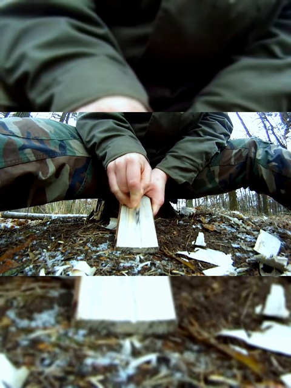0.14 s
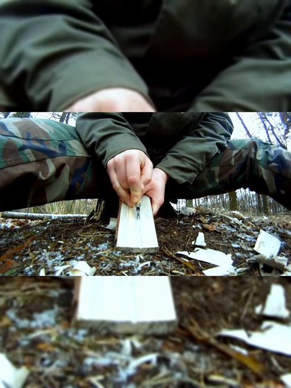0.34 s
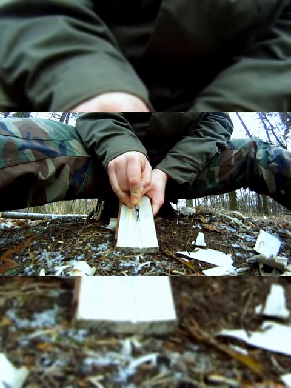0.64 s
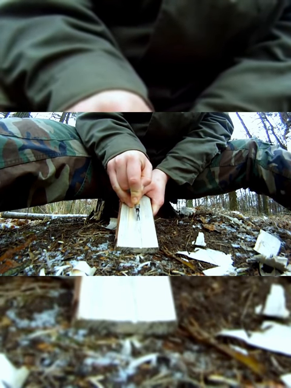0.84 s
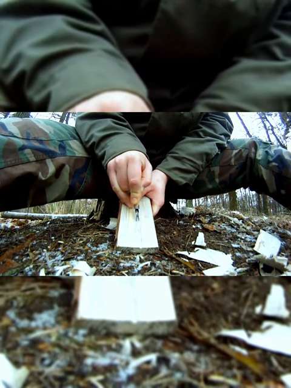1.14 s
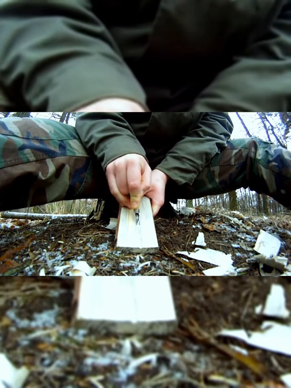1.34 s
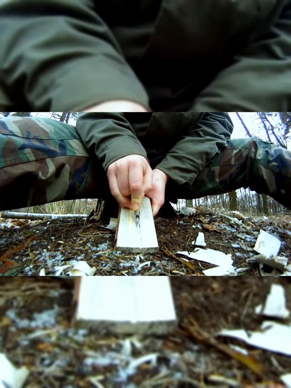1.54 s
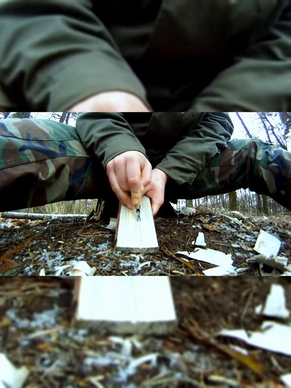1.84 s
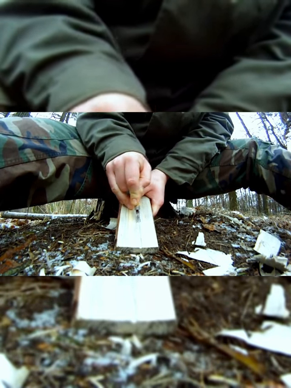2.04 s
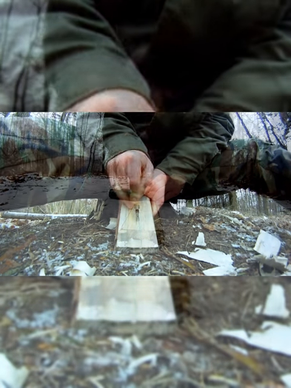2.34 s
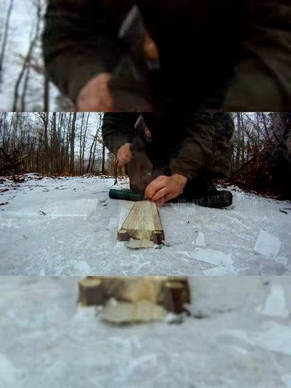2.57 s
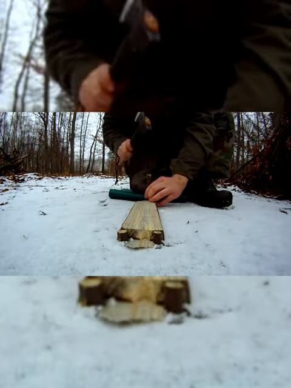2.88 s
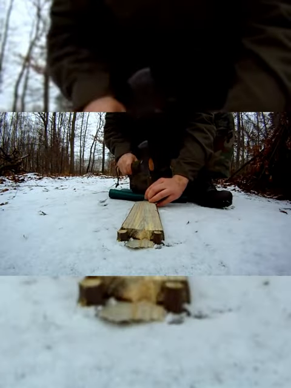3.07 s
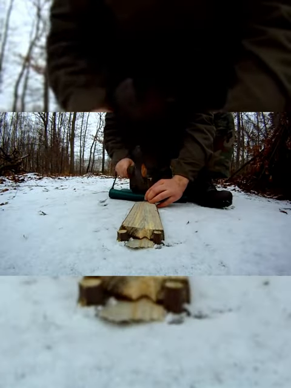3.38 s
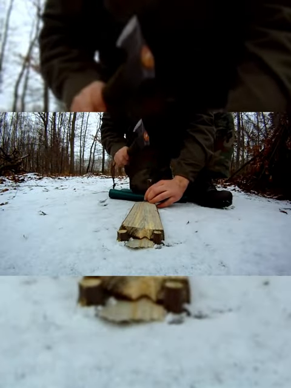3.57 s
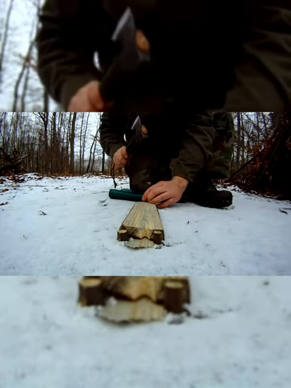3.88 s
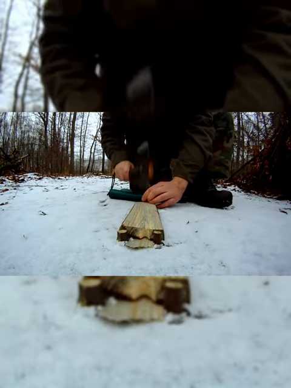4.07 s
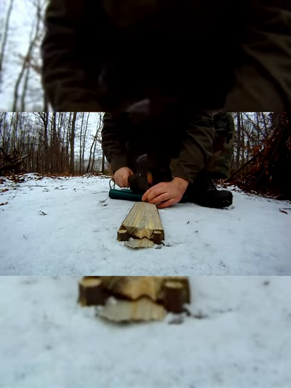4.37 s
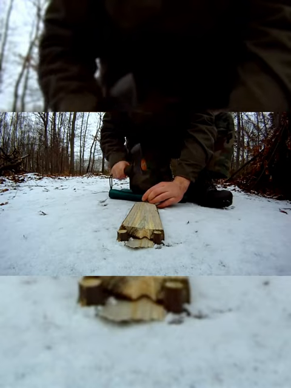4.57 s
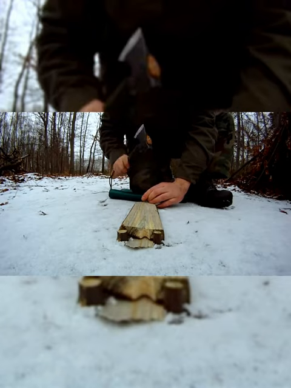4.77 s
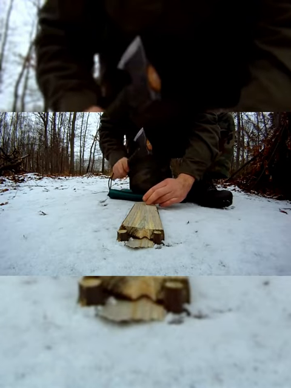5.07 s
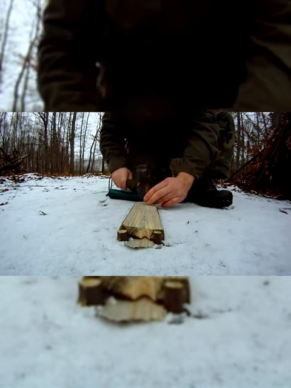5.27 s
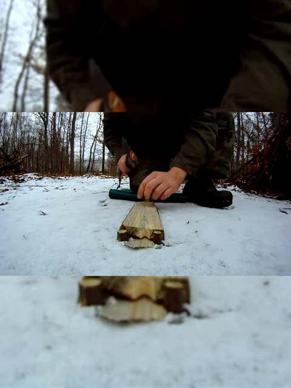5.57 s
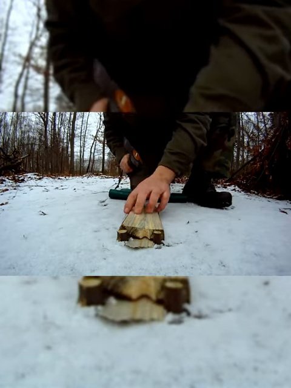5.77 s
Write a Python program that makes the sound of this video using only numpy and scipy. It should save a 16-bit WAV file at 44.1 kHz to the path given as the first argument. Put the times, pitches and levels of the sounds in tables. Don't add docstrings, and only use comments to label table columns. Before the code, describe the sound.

A knife point softly scratches and knocks on wood outdoors, then sped-up hatchet hits pound fast, cracking and thudding with distortion.

```python
import sys
import numpy as np
from scipy import signal
from scipy.fft import rfft, irfft, next_fast_len
from scipy.io import wavfile
from scipy.ndimage import uniform_filter1d, map_coordinates

SR = 44100
rng = np.random.default_rng(int(sys.argv[2]) if len(sys.argv) > 2 else 0)


def wav_record(signal):
    frames = np.transpose(np.atleast_2d(signal))
    bounded = np.clip(frames, -1, 1)
    quanta = np.round(bounded * 32767).astype(np.int16)
    wavfile.write(sys.argv[1], SR, quanta)


def magnitude_from_level(level_db):
    exponent = np.asarray(level_db, float) / 20
    return 10 ** exponent


N = 261051
SPAN = 2048
NEXT_PEG = 4.08

# t/s, thud peak level/dB, crack level/dB, lead-in swing level/dB
BLOWS = [(2.4407, -6, -22, -20), (2.57, -41, -64.5, -48), (2.7246, -4.5, -8.5, -19.5), (2.861, -3, -8, -21),
         (3.0033, -3, -9.5, -20), (3.1475, -5, -13.5, -13.5), (3.2873, -4, -9, -22.5),
         (3.4317, -6, -12, -17), (3.582, -6.5, -12, -26.5), (3.7213, -7, -14, -11.5),
         (3.8521, -25.5, -56, -21), (3.996, -6.5, -21.5, -44), (4.1558, -4.5, -12, -22),
         (4.3028, -4.5, -14, -13.5), (4.446, -3.5, -17, -16.5), (4.5986, -4, -17.5, -25),
         (4.7458, -11, -22, -12.5), (4.89, -7.5, -15, -24.5), (5.0314, -55, -64.5, -17),
         (5.1842, -4.5, -13, -28), (5.3276, -5, -17, -17), (5.4607, -4, -21, -21)]
# centre t/s, bass level/dB, wood level/dB, tint f/Hz, tint level/dB
BLUR_COPIES = [(2.436, -74, -33, 1400, 9.5), (2.5726, -25.5, -35.5, 870, 0.5), (2.718, -58.5, -34, 2260, 1),
               (2.8565, -51.5, -36, 1200, -13), (3.0022, -41.5, -33, 2590, 5),
               (3.1417, -53, -34.5, 3860, 9), (3.2844, -48.5, -32, 1090, -10),
               (3.4254, -52, -31.5, 1070, -11), (3.576, -36.5, -32, 1047, -11.5),
               (3.7148, -38.5, -33.5, 800, -11.5), (3.861, -30, -29.5, 3100, 7.5),
               (4.0055, -31, -30, 3250, 11.5), (4.1505, -61, -36, 4390, 7), (4.297, -56, -38, 3340, -5),
               (4.4419, -39, -38.5, 4270, 0), (4.595, -48, -39.5, 1170, 0.5),
               (4.74, -42, -38.5, 4900, 16.5), (4.889, -57, -39, 670, -9.5), (5.0335, -30, -38, 798, -13),
               (5.1851, -44, -41.5, 3900, -5), (5.323, -51, -43, 3500, -13.5),
               (5.4581, -58, -44, 1607, -23.5)]
# f/Hz, level/dB per Hz
GROUND = [(18, -18.5), (30, -22), (103, 5.5), (163, -1), (495, -4.5), (613, -17), (815, -17.5),
          (900, -21.5), (1170, -65), (1980, -120)]


def unit(x):
    return x / np.sqrt(np.mean(x ** 2) + 1e-20)


def bumps(hz, shapes):
    return sum(db * np.exp(-((hz - centre) / width) ** 2) for centre, width, db in shapes)


def noise(spectrum, length, ripple_db=0., ripple_hz=300., channels=1, bells=()):
    m = next_fast_len(length + 2048)
    hz = np.fft.rfftfreq(m, 1 / SR)
    f, level_db = np.transpose(spectrum)
    ripple = map_coordinates(rng.standard_normal(1000), [hz / ripple_hz], order=3)
    colour_db = np.interp(np.log(hz + 1), np.log(f + 1), level_db)
    colour = magnitude_from_level(colour_db + ripple_db * ripple + bumps(hz, bells))
    white = rfft(rng.standard_normal((channels, m)))
    return unit(irfft(white * colour, m)[:, :length])


def add(track, s, sound):
    start = round(s * SR)
    track[..., start:start + sound.shape[-1]] += sound


def apart(mid, side):
    return np.array([mid + side, mid - side])


def forest():
    # t/s, level/dB
    stir = [(0, -60), (1.3, -60), (1.55, -59.5), (2.189, -59.5), (2.41, -55), (2.9, -62), (3.5, -58),
            (4.06, -58), (4.45, -60.5), (4.85, -58.5), (5.92, -58.5)]
    # f/Hz, level/dB per Hz
    rumble_colour = [(15, -35), (25, -9.5), (140, 1), (372, -8), (533, -5.5), (708, -16), (900, -34),
                     (1170, -49), (1980, -120)]
    hiss_colour = [(410, -18.5), (700, -2), (950, -5.5), (1440, -5), (3740, -10), (4990, -14), (6070, -19),
                   (7100, -17), (9000, -16.5), (12000, -20.5), (14800, -21), (15450, -25.5), (15560, -65)]
    t = np.arange(N) / SR
    stir_db = np.interp(t, *np.transpose(stir))
    rows = np.array([0 * t, 0 * t + 1])
    drift = map_coordinates(rng.standard_normal((2, 200)), [rows, np.array([14 * t, 9 * t])], order=1)
    rumble = magnitude_from_level(stir_db + 2.4 * drift[0]) * noise(rumble_colour, N)[0]
    hiss_gain = magnitude_from_level(stir_db - 10 + 0.4 * drift[1])
    hiss, other = hiss_gain * noise(hiss_colour, N, channels=2)
    return apart(rumble + hiss, magnitude_from_level(-2.5) * other)


def echoes():
    # f/Hz, level/dB per Hz
    tree_colour = [(410, -38.5), (700, -6), (1250, -26.5), (1380, -17.5), (1600, -12.5), (2800, -3.5),
                   (3410, -10), (4610, -15), (5920, -30.5), (9110, -13), (10900, -36.5), (15200, -18),
                   (16000, -36.5)]
    # t/s, level/dB
    tree_line = [(2.43, -74), (2.86, -58.5), (3.1, -56.5), (3.9, -59.5), (4.15, -66), (5.46, -67.5)]
    # level/dB, T60/s
    near_ground = [(-44.5, 0.024), (-45, 0.11)]
    # delay t/s, width t/s, level/dB over the hump
    trunk = (0.071, 0.0024, 0)
    track = np.zeros((2, N + SR))
    t = np.arange(6000) / SR
    slap_s, slap_width, slap_db = trunk
    slap = magnitude_from_level(slap_db) * np.exp(-((t - slap_s) / slap_width) ** 2)
    late = np.maximum(t - 0.032, 0) / 0.021
    hump = late ** 0.82 * np.exp(0.67 * (1 - late))
    for s, thud_db, *_ in BLOWS:
        echo_db = np.interp(s, *np.transpose(tree_line))
        near_db, t60 = near_ground[int(s > NEXT_PEG)]
        near_gain = magnitude_from_level(max(thud_db, -12) + near_db - 60 * t / t60)
        near = near_gain * noise(tree_colour, len(t), ripple_db=2, channels=2)
        boom = magnitude_from_level(thud_db - 12.5 - 60 * t / 0.026) * noise(GROUND, len(t))[0]
        far = magnitude_from_level(echo_db - 5) * (hump + slap) * noise(tree_colour, len(t), channels=2)
        add(track, s, apart(near[0] + far[0] + boom, magnitude_from_level(-9.5) * near[1] + magnitude_from_level(-31.5) * far[1]))
    return track[:, :N]


def touches():
    # centre t/s, length t/ms, knock level/dB, scratch level/dB, grit f/Hz
    knife = [(0.053, 32, -61, -72, 1600), (0.2, 19.3, -60, -69.5, 1600), (0.243, 13.3, -52, -60, 1570),
             (0.282, 38.5, -45, -59, 1700), (.395, 28, -52, -67, 3700), (0.454, 25, -58, -77, 1600),
             (.49, 180, -67, -74, 3700), (.521, 220, -82, -87, 8300), (.712, 35, -55, -64, 1600),
             (0.807, 45.4, -47.5, -56.5, 1540), (.902, 13, -49.5, -65, 1980), (1.013, 27, -60, -69.5, 1600),
             (1.349, 38, -56.5, -68.5, 1600), (1.402, 37, -49.5, -57.5, 1610),
             (1.639, 32, -51.5, -63.5, 1960), (1.673, 3.9, -42, -44.5, 1800),
             (1.696, 57.5, -47, -58.5, 1740), (1.892, 4.6, -46, -57, 2970), (2.179, 4.5, -48, -52, 4800),
             (2.19, 5.5, -43.5, -49.5, 7360), (2.18, 21, -80, -59.5, 4970), (2.225, 7.1, -45, -53.5, 4500),
             (2.255, 43, -53, -71, 3000)]
    # centre t/s, length t/ms, knock
    # level/dB, scratch level/dB, grit f/Hz
    later_ticks = [(2.36, 56, -49, -69, 3660), (2.501, 35, -64, -61.5, 1620), (4.018, 10, -26, -36, 1990),
                   (5.003, 13, -50, -66, 1500), (4.215, 8.8, -57, -66, 2000), (4.358, 9, -61, -63, 2010),
                   (5.255, 7.3, -61, -60, 7900), (5.512, 27.4, -52, -84, 3000), (5.596, 18, -65, -64.5, 1980),
                   (5.768, 27.6, -39, -63.5, 1650), (5.804, 22, -48, -63, 2260)]
    # length t/ms, knock f/Hz
    knock_pitch = [(9, 452), (14, 167), (45, 132.4)]
    # f/Hz, level/dB per Hz
    scratch_colour = [(410, -25.5), (700, -3.5), (1230, -13), (1520, -3.5), (2400, -12.5), (2960, -6),
                      (4210, -25), (4800, -7.5), (5990, -32.5), (7110, -15), (7790, -19), (14600, -23),
                      (16000, -26.5)]
    track = np.zeros((2, N + SR))
    for s, ms, knock_db, scratch_db, grit_hz in knife + later_ticks:
        length = round(1.6 * ms * SR / 1000)
        grit = magnitude_from_level(17 * uniform_filter1d(rng.standard_normal(16000), 40))[:length]
        grit_width = np.interp(ms, [60, 200], [0.15, 0.03]) * grit_hz
        grit_db = np.interp(ms, [60, 200], [8, 22])
        rasp = noise(scratch_colour, 16000, ripple_db=0.5, ripple_hz=494, channels=2,
                     bells=[(grit_hz, grit_width, grit_db)])
        scratch, other = magnitude_from_level(scratch_db + 2.5) * unit(grit * rasp[:, :length])
        knock_hz = np.interp(ms, *np.transpose(knock_pitch))
        thump = noise(GROUND, 16000, bells=[(knock_hz, 0.12 * knock_hz, 16)])[0, :length]
        knock = magnitude_from_level(knock_db) * unit(thump)
        sound = np.hanning(length) * apart(knock + scratch, magnitude_from_level(-36) * other)
        add(track, s - length / SR / 2, sound)
    return track[:, :N]


def blurs():
    # f/Hz, level/dB per Hz
    wood_colour = [
        [(290, -40.5), (500, -19.5), (923, -4.5), (1410, 7.5), (1740, -0.5), (2120, 3), (2750, -4),
         (3350, -11.5), (4390, -6.5), (4820, -15), (6000, -21.5), (7800, -59), (13200, -120)],
        [(290, -71), (500, -4.5), (973, -5.5), (1360, 1), (1890, -6), (2210, 4), (2670, -10), (3600, -8),
         (3960, -13), (4440, -9.5), (6000, -32.5), (7800, -77), (13200, -120)],
    ]
    steel_colour = [
        [(3410, -50), (5800, -9), (7840, 4.5), (8540, 0), (9530, 7.5), (10200, 5.5), (11200, -4), (12800, 0),
         (14400, 6), (15200, 0), (16000, -7)],
        [(3410, -41), (5800, -3), (6450, -5), (6960, 4), (8360, 5), (10900, -3.5), (11900, 5.5), (13400, -7),
         (14600, 7), (15500, -11), (16000, -23.5)],
    ]
    # steel level/dB, left-right difference level/dB
    under_wood = [(-10.5, -8.5), (-9, -8.5)]
    track = np.zeros((2, N + SR))
    window = np.hanning(SPAN)
    for (s, bass_db, wood_db, tint_hz, tint_db), (blow_s, thud_db, *_) in zip(BLUR_COPIES, BLOWS):
        peg = int(s > NEXT_PEG)
        steel_under_db, side_under_db = under_wood[peg]
        steel_db = wood_db + steel_under_db
        side_db = wood_db + side_under_db + 5.5 * (thud_db < -25)
        since = s - blow_s + (np.arange(SPAN) - SPAN / 2) / SR
        ducked = magnitude_from_level(-5 * (thud_db > -25) * np.clip(since / 0.0069, 0, 1))
        bass = magnitude_from_level(bass_db + 5) * noise(GROUND, SPAN, ripple_db=1, ripple_hz=47)[0]
        wood, other = noise(wood_colour[peg], SPAN, ripple_db=4, ripple_hz=148.6, channels=2,
                            bells=[(tint_hz, 500, tint_db)])
        steel = noise(steel_colour[peg], SPAN, ripple_db=4.5, ripple_hz=303)[0]
        edge = noise(steel_colour[peg], SPAN, bells=[(14000, 3000, -13.5)])[0]
        body = magnitude_from_level(wood_db + 3.5) * wood + magnitude_from_level(steel_db + 5) * steel
        mid = window ** 0.39 * bass + window ** 0.93 * ducked * body
        side = window ** 1.06 * magnitude_from_level(side_db + 3.5) * (other + magnitude_from_level(steel_db - wood_db) * edge)
        add(track, s - SPAN / SR / 2, apart(mid, side))
    return track[:, :N]


def struck_head(struck, modes, bells):
    head = 0
    for hz, db in modes:
        gain = magnitude_from_level(db + bumps(hz, bells) + rng.normal(0, 3.8))
        mode_hz = hz * rng.normal(1, 0.068)
        phase = rng.normal(0, 1.73) * (hz > 3000)
        head = head + gain * np.sin(2 * np.pi * mode_hz * struck + phase)
    return head * (1 - np.exp(-(struck / 0.00024) ** 2)) * np.exp(-struck / 0.0014)


def blows():
    # f/Hz, level/dB
    head_modes = [
        [(2045, -4), (1357, 3), (2767, -13), (3830, -15), (7470, -18.5), (9670, -14.5), (12300, -21.5),
         (13800, -15.5)],
        [(2467, -1), (1200, -24.5), (3700, -7), (4800, -15), (7240, -19.5), (9320, -14), (9320, -15),
         (12100, -9), (14060, -17.5)],
    ]
    # crack ahead t/ms, swing stretch, overload level/dB, T60/s, lead-in f/Hz
    peg_impacts = [(.6, 0.611, 15.5, 0.031, 111.5), (.25, 0.623, 10, 0.033, 104)]
    # level/dB over the crack, f/Hz, T60/s
    board_ring = [(-13.5, 453, 0.018), (-7.5, 407, 0.033)]
    track = np.zeros(N + SR)
    t = np.arange(-SPAN, SPAN) / SR
    after = np.maximum(t, 0)
    for (s, thud_db, crack_db, lead_db), (*_, tint_hz, tint_db) in zip(BLOWS, BLUR_COPIES):
        peg = int(s > NEXT_PEG)
        ring_db, ring_hz, ring_t60 = board_ring[peg]
        ahead_ms, stretch, over_db, t60, lead_hz = peg_impacts[peg]
        push_ms = 1.389 + 0.035 * np.clip(-4 - thud_db, -2, 8)
        swing = np.sin(np.pi * (1000 * after / push_ms) ** stretch)
        swing *= magnitude_from_level(-60 * after / 0.058) * (1 - np.exp(-(after / 0.00019) ** 2))
        ring = magnitude_from_level(crack_db + ring_db + 3.5 - 60 * after / ring_t60) * np.sin(2 * np.pi * ring_hz * after)
        ring *= 1 - np.exp(-after / 0.0012)
        struck = np.maximum(t + ahead_ms / 1000, 0)
        crack = struck_head(struck, head_modes[peg], [(tint_hz, 600, tint_db)])
        drive = magnitude_from_level(over_db + thud_db)
        squared = np.tanh(drive * (swing - magnitude_from_level(crack_db - thud_db + 2) * crack)) / np.tanh(drive)
        squared = uniform_filter1d(squared, size=2)
        before = np.clip(-t / 0.03, 0, 1)
        to_go = 0.0006 - t
        lead = -np.sin(2 * np.pi * lead_hz * to_go) * np.cos(np.pi * before / 2) ** 2.87 * (to_go > 0)
        lead *= 1 - np.exp(-(np.maximum(to_go, 0) / 0.0004) ** 2)
        thud = magnitude_from_level(thud_db - 0.05 - 60 * after / t60) * squared
        add(track, s - SPAN / SR, thud + ring + magnitude_from_level(lead_db - 5) * lead)
    return track[:N]


def scene():
    return blows() + blurs() + echoes() + touches() + forest()


def roll_off(x):
    return signal.sosfilt(signal.butter(12, 16180, fs=SR, output="sos"), x)


def record(dry):
    # f/Hz, width f/Hz, level/dB
    housing = [(6100, 300, -13), (9400, 70, -4), (11050, 110, -7), (13050, 110, -8), (16000, 450, -20)]
    m = next_fast_len(N + SPAN)
    hz = np.fft.rfftfreq(m, 1 / SR)
    response = magnitude_from_level(bumps(hz, housing)) * (hz < 15830)
    heard = irfft(rfft(dry, m) * response, m)[:, :N]
    return roll_off(heard)


dry = scene()
out = record(dry)
wav_record(out)
```